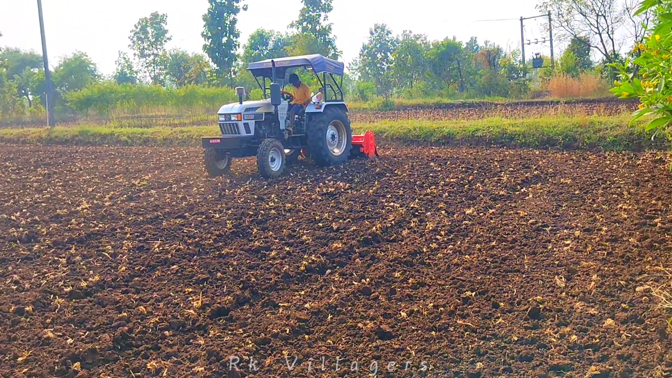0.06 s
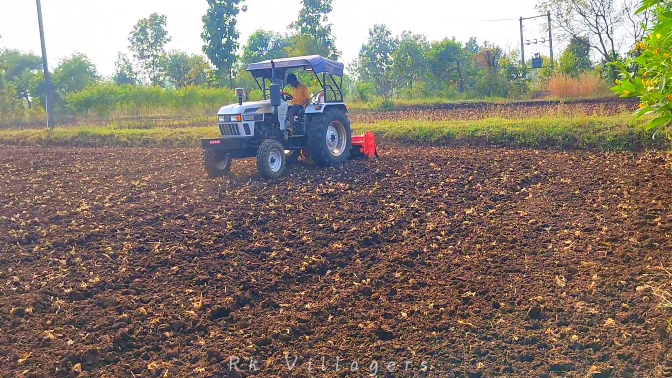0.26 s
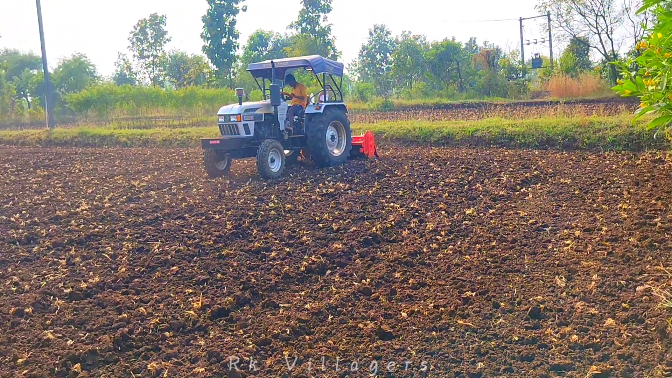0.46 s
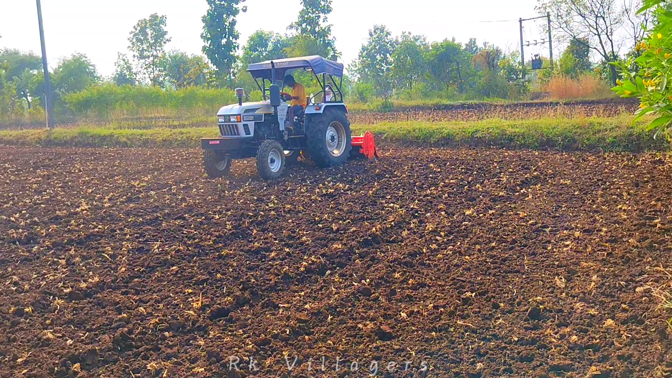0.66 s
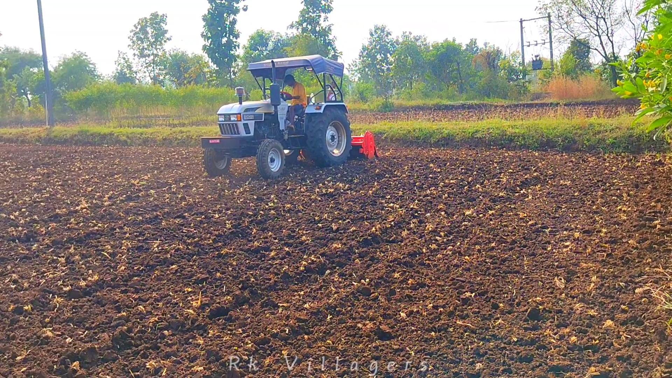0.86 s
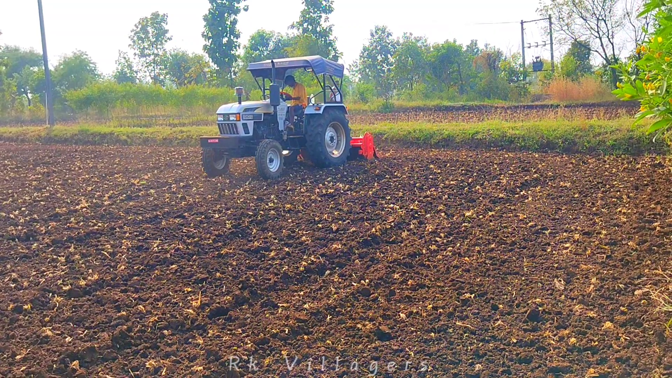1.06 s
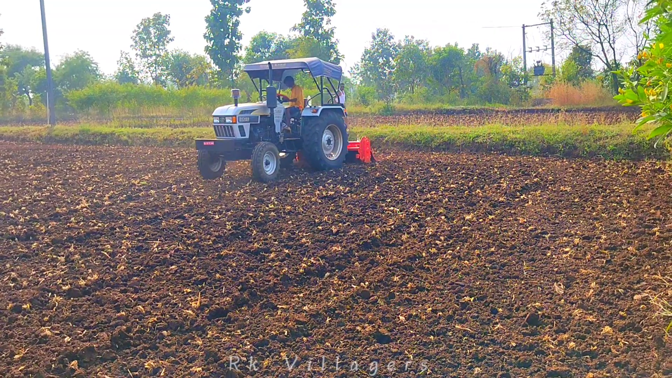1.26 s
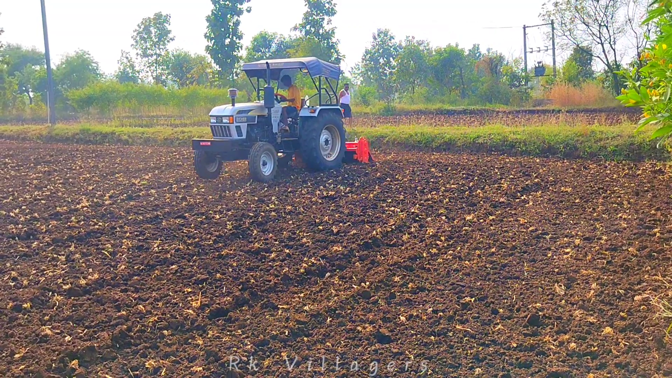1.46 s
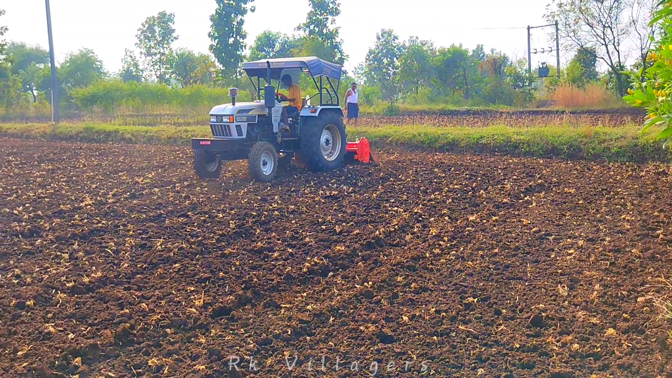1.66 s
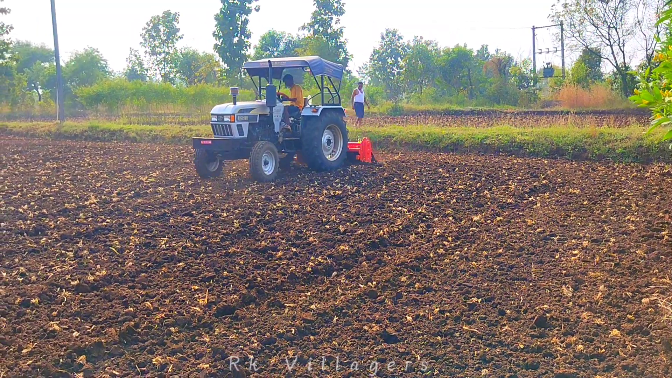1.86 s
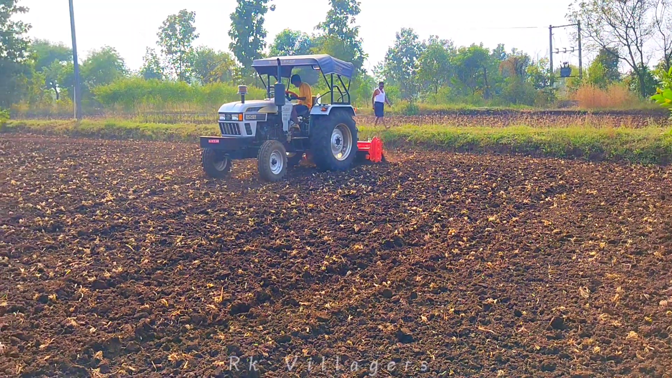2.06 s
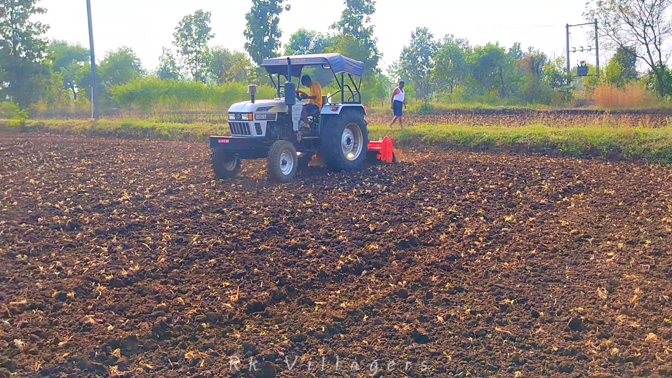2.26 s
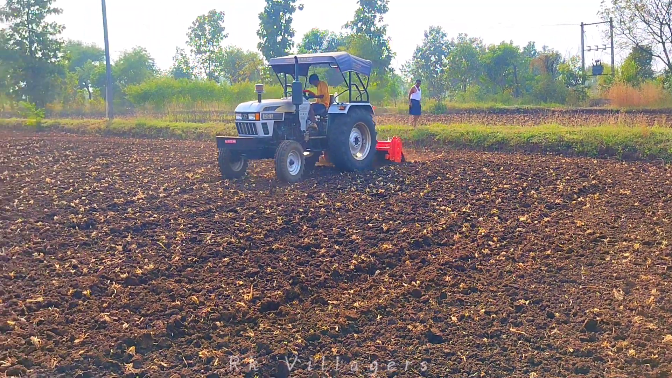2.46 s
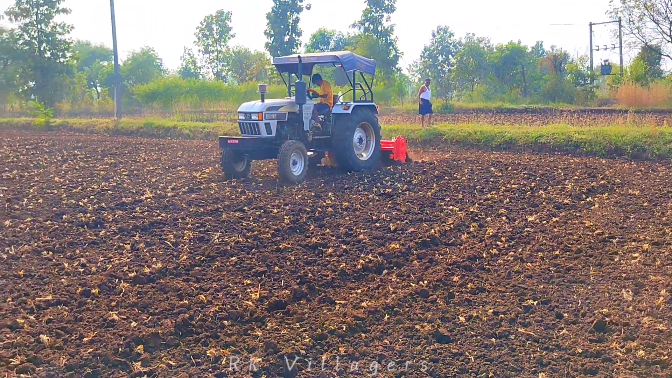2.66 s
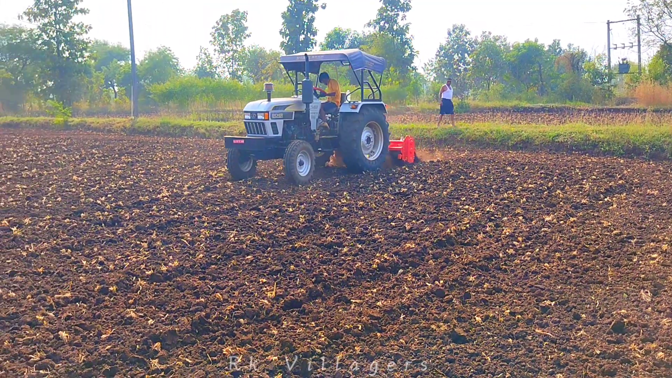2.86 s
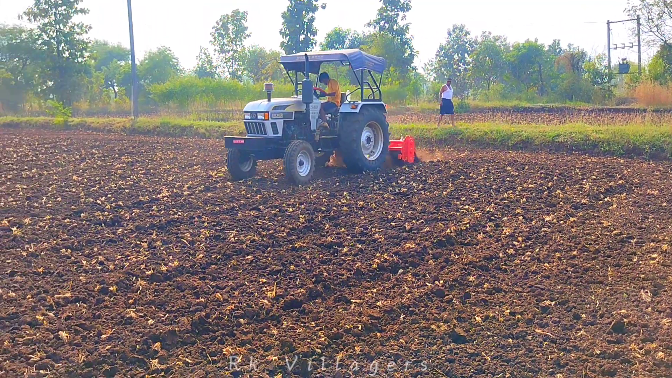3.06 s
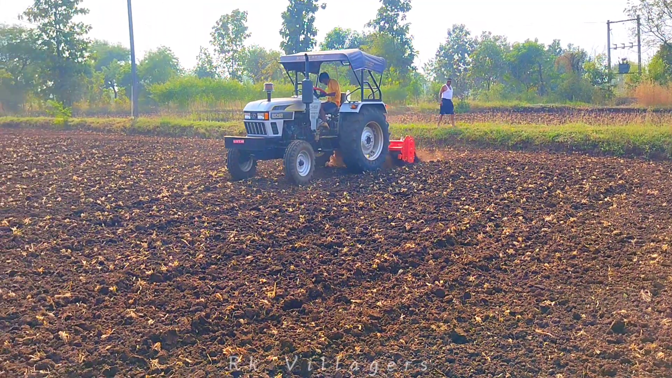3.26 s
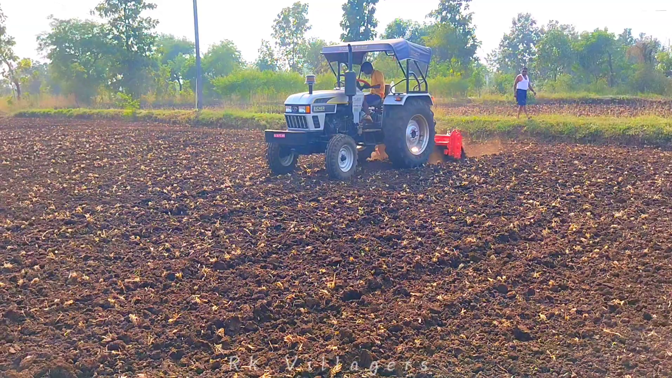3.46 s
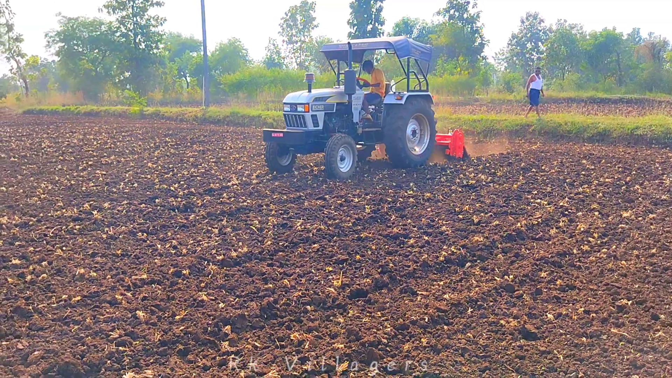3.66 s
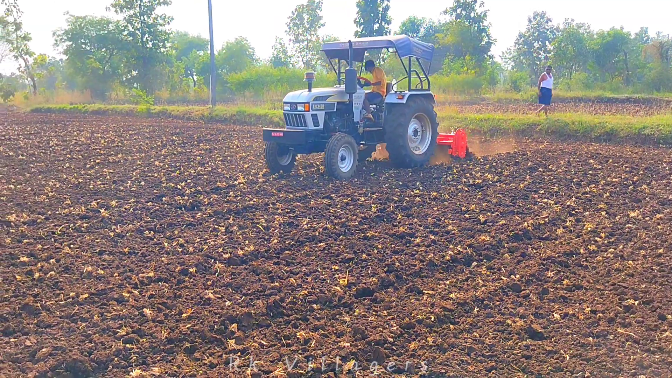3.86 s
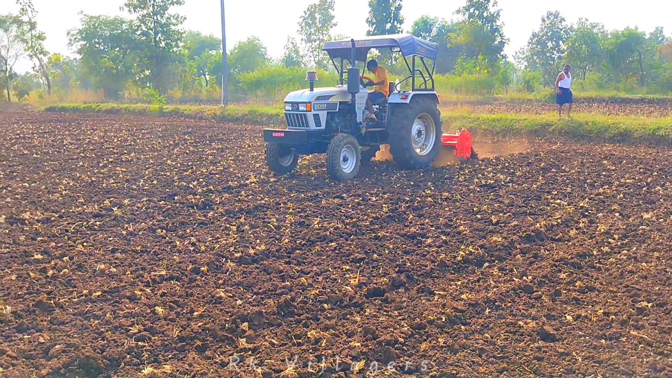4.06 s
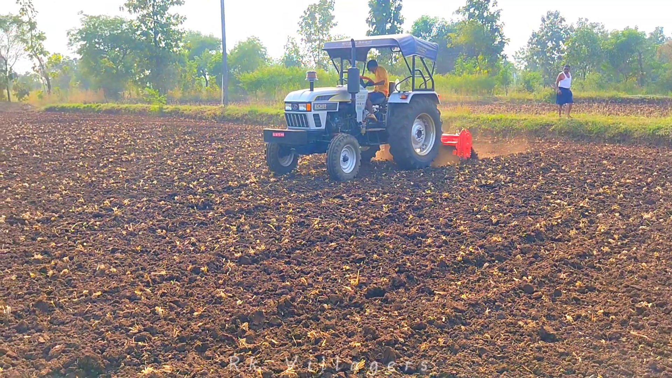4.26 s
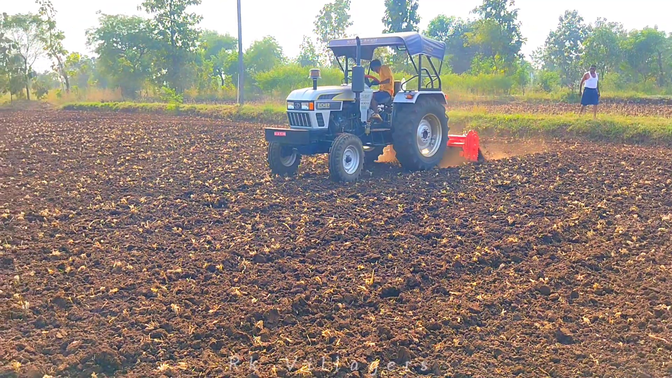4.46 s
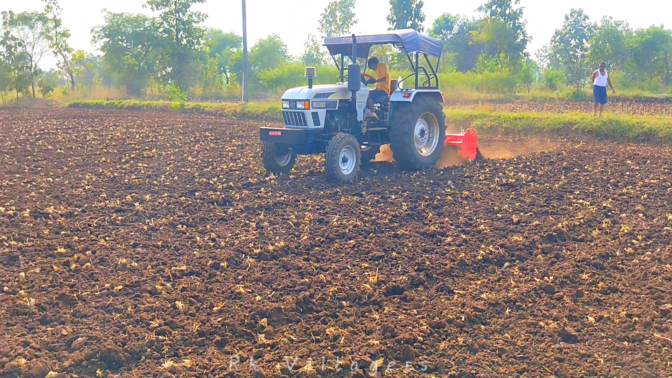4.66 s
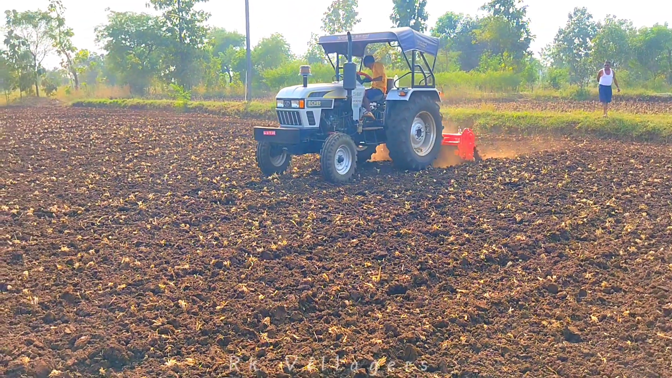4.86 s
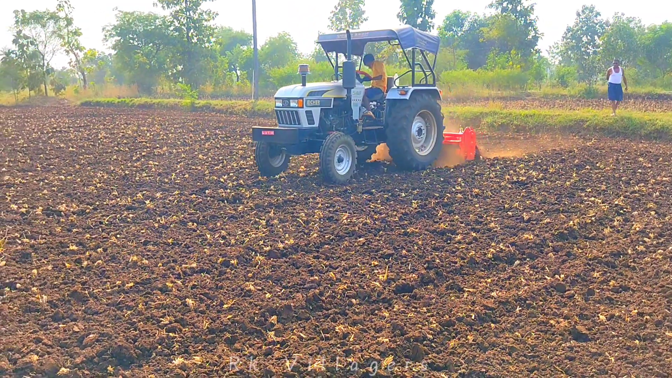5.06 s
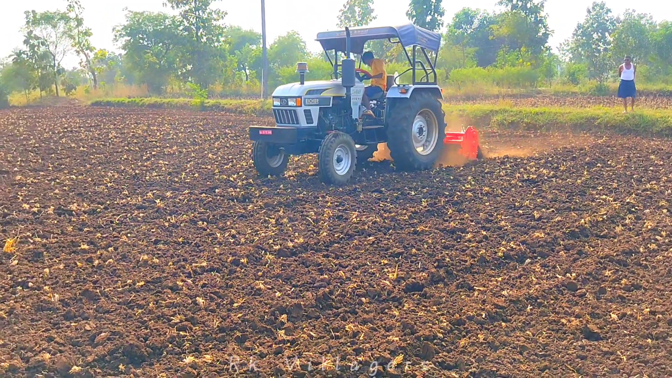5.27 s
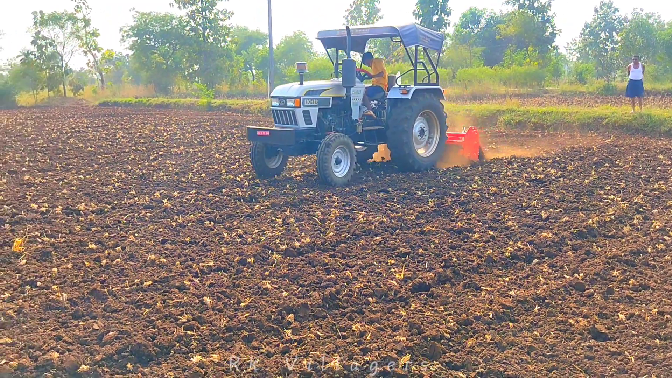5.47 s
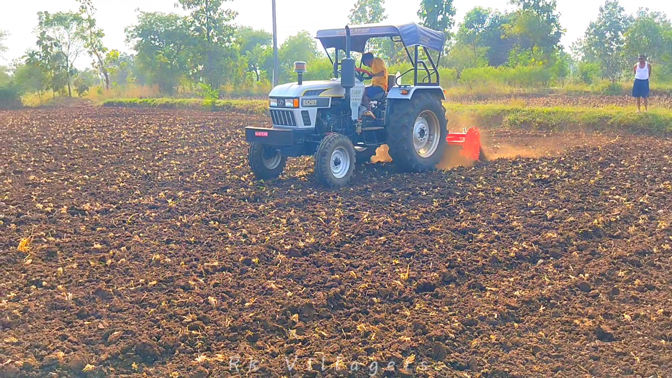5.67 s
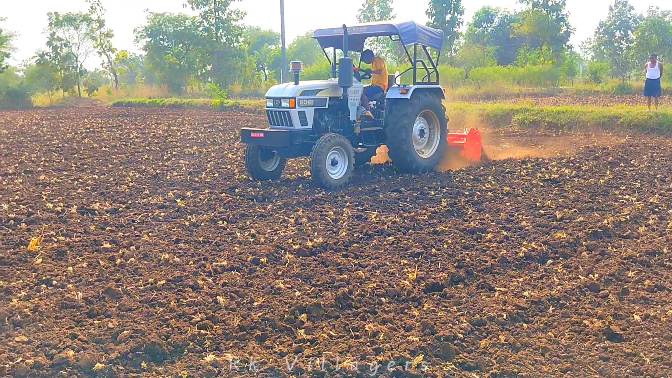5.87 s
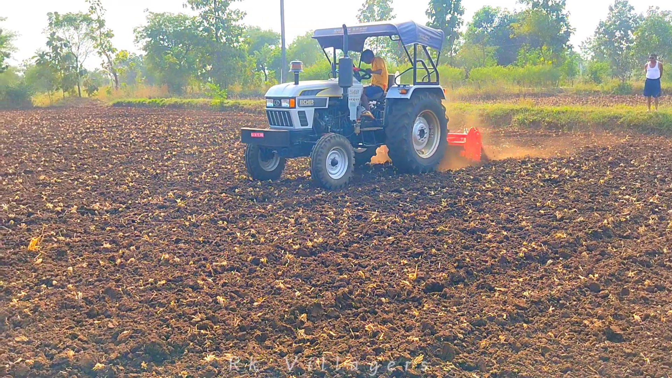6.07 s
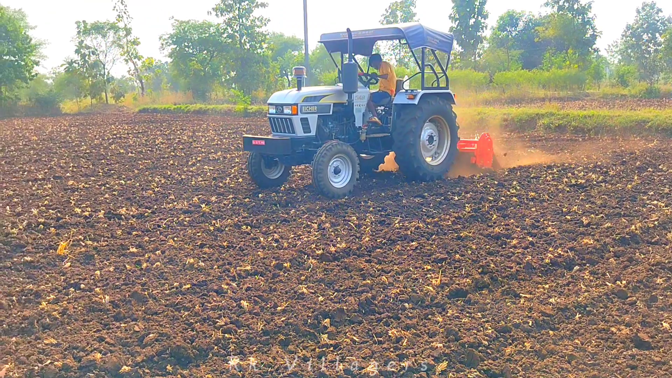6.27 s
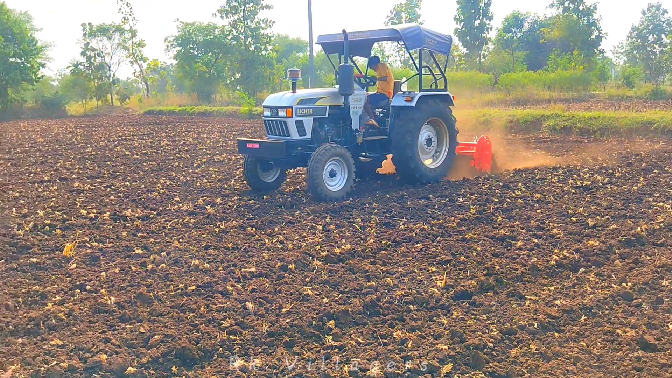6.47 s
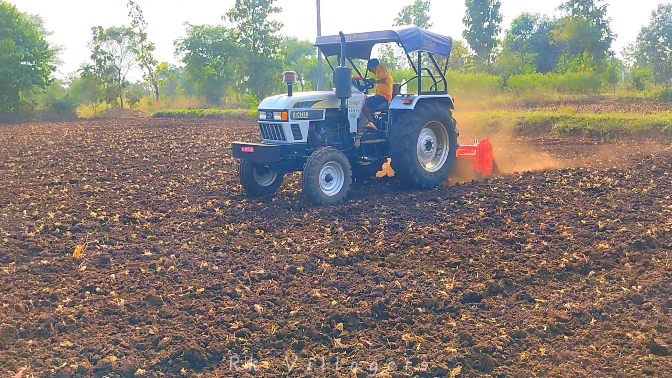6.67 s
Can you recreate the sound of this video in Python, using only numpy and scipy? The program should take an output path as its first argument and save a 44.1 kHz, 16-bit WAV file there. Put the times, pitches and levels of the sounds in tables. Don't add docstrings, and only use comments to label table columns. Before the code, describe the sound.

Outdoors in an open field, a three-cylinder diesel tractor idles with soft, separate chugs and iron clatter. After about a second it throttles up, the beats quickening into a deep, spitting exhaust roar. It overshoots, eases briefly, then returns under load, dragging a rotary tiller with a hiss and faint gear whine. A fixed stereo microphone at some distance hears it draw nearer, brighter and more rattly.

```python
import sys
import numpy as np
from scipy import signal
from scipy.fft import rfft, irfft
from scipy.io import wavfile
from scipy.ndimage import uniform_filter1d

SR = 44100
rng = np.random.default_rng(int(sys.argv[2]) if len(sys.argv) > 2 else 0)


def gain_from_db(level_db):
    decades = np.asarray(level_db, float) / 20
    return 10 ** decades


def digitize_waveform(pressure):
    field = np.atleast_2d(pressure).T
    bounded = np.clip(field, -1, 1)
    quanta = np.round(bounded * 32767).astype(np.int16)
    wavfile.write(sys.argv[1], SR, quanta)


N = 296330


def level(x, db):
    return x * gain_from_db(db) / np.sqrt(np.mean(x ** 2))


def on_hz(table, column):
    hz = np.maximum(np.arange(N // 2 + 1) * SR / N, 1)
    return np.interp(np.log(hz), np.log(np.array(table)[:, 0]), np.array(table)[:, column])


def colour(x, gain_db):
    return irfft(rfft(x) * gain_from_db(gain_db), N)


def ring(x, modes):
    out = 0
    for hz, width, db in modes:
        out = out + gain_from_db(db) * signal.lfilter(*signal.iirpeak(hz, hz / width, SR), x)
    return out


def walk(rate):
    k = int(SR / rate)
    steps = np.repeat(rng.standard_normal(N // k + 1), k)
    x = uniform_filter1d(uniform_filter1d(steps, k), k)[:N]
    return x / x.std()


def strokes(times, sizes):
    place = np.clip(times * SR, 0, N - 2)
    out, i = np.zeros(N), place.astype(int)
    np.add.at(out, i, sizes * (1 - place + i))
    np.add.at(out, i + 1, sizes * (place - i))
    return out


def puffs(clicks, rise_s, fall_s):
    t = np.arange(int(.06 * SR)) / SR
    out = signal.fftconvolve(clicks, (1 - np.exp(-t / rise_s)) * np.exp(-t / fall_s))[:N]
    return np.maximum(out, 0) / out.mean()


# frequency in Hz, likeness of the ports 0-1, left minus right in dB.
PORTS = [(583, 0.9, 1), (860, 1, 0), (1380, 0.88, 0), (1940, 0.29, 0), (3700, 0.31, -0.5),
         (5430, 0.4, -5.5), (7000, 0.14, -2), (9300, 0.18, 0.5), (11200, 0.55, 11), (12900, 0, -2),
         (14700, 0.9, -2)]
BASS_PORT = [(150, .999, 0)]
ALL_PORTS = list(BASS_PORT) + list(PORTS)


def air():
    right_lag_s = .00021
    like = np.clip(on_hz(ALL_PORTS, column=1), 0, 1)
    shared, left, right = rfft(rng.standard_normal((3, N)))
    hz = np.arange(len(like)) * SR / N
    late = np.exp(-2j * np.pi * hz * right_lag_s * np.clip((hz - 400) / 1100, 0, 1))
    common = np.sqrt(like) * np.array([shared, shared * late])
    own = np.sqrt(1 - like) * np.array([left, right])
    return irfft(common + own, N)


# time in seconds, firing rate in firings per second.
SPEED = [(0, 18.571), (.13, 19.452), (.6, 19.021), (.96, 19.39), (1.28, 19.46), (1.45, 22.643),
         (1.86, 26.392), (2.83, 37.882), (3.14, 37.883), (3.54, 37.123), (4.44, 37.019), (5.11, 37.323),
         (5.61, 36.735), (6.72, 37.023)]


def crank(t):
    already_turned = .733
    hz = np.interp(t, *np.transpose(SPEED))
    return already_turned + np.cumsum(hz) / SR, 20 * np.log10(hz / hz.max())


def firings(count, t):
    return np.interp(np.arange(1, int(count[-1]) + 1), count, t)


# time in seconds, fuel load in dB re full, air draw in dB re full.
EFFORT = [(0, -25, -5.5), (.25, -25, -9), (.85, -12.5, -7), (1.05, -5, -1), (1.3, 0, 1.5), (2.05, -1, 2),
          (2.45, 0, 0), (2.65, 0, -6), (2.9, -2.5, -4), (3.05, -4.5, -9), (3.25, -8, -10), (3.5, -3, -5),
          (4.0, -2, 0), (4.5, -1, -1), (6.72, -1, -3)]


def levels(t, speed_db):
    stack_holds_s, bite_s = 0.093, 2.4
    s, load, draw = np.transpose(EFFORT)
    held = np.maximum(np.interp(t, s, load), np.interp(t - stack_holds_s, s, load))
    load, draw = np.interp(t, s, load), np.interp(t, s, draw)
    thump = gain_from_db(-20 + load)
    hum = gain_from_db(-29 + draw)
    knock = gain_from_db(-27.5 + 0.2 * load + 0.51 * t)
    tilling = -1.5 * np.clip(t - bite_s, 0, 1) * np.exp(-np.maximum(t - bite_s, 0) / 0.83)
    spit = gain_from_db(-50.5) + gain_from_db(-34 + tilling + 5.3 * np.minimum(held + .5, 0))
    fan = gain_from_db(-39.5 + 0.55 * speed_db + 0.16 * load + 1.5 * t)
    return thump, hum, knock, spit, fan


CYLINDER_DB = [-1.1, -3, -0.5]
# frequency in Hz, width in Hz, level in dB.
STACK = [
    (41, 41, 0),
    (110, 59, 0),
]


def exhaust(fired, gap, chance):
    fast = gap.min() / gap
    size = gain_from_db(np.resize(CYLINDER_DB, len(fired)) * fast ** 2 + .55 * chance[0]) * np.sqrt(gap)
    slow = np.clip(gap / gap.min() - 1.1, 0, .6) / .6
    flow = 0
    for share, width_s in ((1 - slow, .0012), (.85 * slow, .0019)):
        slug = np.exp(-.5 * (np.arange(-400, 401) / SR / width_s) ** 2) / width_s
        clicks = strokes(fired - .0061 + .0001 * chance[1], share * size)
        flow = flow + signal.fftconvolve(clicks, slug, "same")
    thump = ring(ring(flow, STACK[:1]), STACK[1:])

    t = np.arange(N) / SR
    gusts = 5.1 + puffs(strokes(fired - .008, size), 0.0035, 0.002)
    rumble = ring(air() * gusts, [(384, 163, 0.5), (154, 106, 3), (276, 36, -2.0)])
    rumble = rumble * (gap.min() / np.interp(t, fired, gap)) ** 1.06
    rumble = gain_from_db(0.66 * t) * level(rumble, -13.5)

    bark = strokes(fired - .0062, size * fast ** 1.3 * gain_from_db(4.1 * chance[27]))
    bark = ring(ring(bark, [(385, 60, 1.3), (230, 23, 0.53)]), [(317, 92, 0)])
    return level(thump, 0) + rumble + level(bark, -18.5)


# frequency in Hz, width in Hz, level in dB.
MOUTH = [(2507, 113, 5), (2706, 71, 2), (3093, 160, 3.5), (3611, 305, 3), (3840, 220, -5.5),
         (4820, 1050, -4), (5340, 57, 2), (6070, 97, -8), (7680, 3000, -10.5), (9130, 210, -5.5),
         (10630, 790, -14.5), (13700, 1000, -17)]


def jet(fired, chance, modes, scatter_db):
    out = 0
    for k, mode in enumerate(modes):
        size = gain_from_db(1.35 * chance[4] + scatter_db * chance[5 + k])
        gate = puffs(strokes(fired - .0075 + 0.00056 * chance[15 + k], size), 0.0021, 0.0025)
        narrow = ring(air() * (0.98 + gate), [mode])
        out = out + ring(narrow, [(mode[0], 2 * mode[1], 0)])
    return level(out, 0)


# frequency in Hz, width in Hz, level in dB.
BLOCK = [(787, 35, 1), (843, 20, 1), (770, 170, 1), (370, 140, -14), (1200, 200, -9), (1365, 70, -2),
         (1500, 110, -1), (1850, 200, -12)]
# frequency in Hz, width in Hz, level in dB.
BONNET = [(560, 60, -8), (617, 18, 1), (693, 16, 3), (660, 160, -3), (1990, 220, -2), (1110, 150, -9)]


def block(fired, gap, chance, load):
    knock = puffs(strokes(fired + .15 * gap, gap * gain_from_db(1.8 * chance[2])), .0015, .0045)
    valves = puffs(strokes(fired + 0.442 * gap, gap ** 1.88 * gain_from_db(0.64 * chance[3])), 0.00034, 0.014)
    knock = knock + 0.99 * load * puffs(strokes(fired - .0035, gain_from_db(3.0 * chance[26])), 0.0013, 0.0041)
    speed = gap.min() / np.interp(np.arange(N) / SR, fired, gap)
    low = ring(air() * (2.17 * speed + 0.57 * knock + .5 * valves), BLOCK[:4])
    low = ring(low, [(765, 2100, -2.0), (382, 185, 0)])
    high = ring(air() * (1.29 * speed ** 3.2 + 0.63 * knock + 0.49 * valves), BLOCK[4:])
    high = ring(high, [(1480, 6400, 2.77)])
    bonnet = speed ** 2 * ring(air() * (2.6 + 0.64 * knock), BONNET)
    return level(low + high + bonnet, 0)


def intake(count, fired, gap):
    late = np.roll(count, 120)
    hum = np.sqrt(2) * np.cos(4 * np.pi * late - 2.3)
    cleaner = [(101, 57, 0)]
    gulp = ring(ring(strokes(fired + .23 * gap, -gap ** 3), cleaner), cleaner)
    return hum + level(gulp, -12)


# frequency in Hz, density in dB per Hz.
HISS = [(1290, 0), (2200, 4), (3200, -10), (3590, -1), (4330, -8), (5320, -6.5), (6260, -7), (8680, -4.5),
        (10700, -6), (13100, -12), (15500, -13.5)]


def hiss():
    shape = on_hz([(1400, -60)] + list(HISS), column=1)
    soil = on_hz([(9000, -40), (11500, 0), (15500, 0)], column=1)
    fan = colour(air() * gain_from_db(1.0 * walk(14)), shape - 8 * gain_from_db(soil))
    thrown = colour(air() * gain_from_db(2.0 * walk(30) + .4 * walk(14)), shape + soil)
    return level(fan + thrown, 0)


def gear(count, t):
    whine = np.sin(2 * np.pi * 30 * count + .9 * walk(9))
    return np.clip((t - 3.0) / .8, 0, 1) * whine * gain_from_db(1.5 * walk(3))


# frequency in Hz, width in Hz, level in dB.
GROUND_DIPS = [(480, 100, -4), (990, 110, -8), (1630, 180, -4), (2250, 200, -9)]


def ground(x):
    return x - ring(x, GROUND_DIPS)


# frequency in Hz, level in dB.
FIELD = [(20, -30), (120, 0), (300, -6), (1000, -12), (4000, -24), (15000, -34)]


def field():
    return level(colour(air(), on_hz(FIELD, column=1)), -52)


def scene():
    t = np.arange(N) / SR
    count, speed_db = crank(t)
    fired = firings(count, t)
    gap = np.gradient(fired)
    chance = rng.standard_normal((len(fired), 28)).T
    thump, hum, knock, spit, fan = levels(t, speed_db)
    tractor = thump * exhaust(fired, gap, chance)
    tractor = tractor + hum * intake(count, fired, gap)
    tractor = tractor + knock * block(fired, gap, chance, thump / thump.max())
    idle = np.clip(1.6 - np.interp(fired, t, thump) / gain_from_db(-30), 0, 1)
    spat = fired - 0.0118 * idle
    tractor = tractor + spit * jet(spat, chance, MOUTH[:8], scatter_db=5.0)
    tractor = tractor + fan * hiss() + gain_from_db(-38) * gear(count, t)
    edge = gain_from_db(-6.5 + 0.52 * t) * np.sqrt(spit * fan)
    tractor = tractor + edge * jet(spat, chance[::-1], MOUTH[8:], scatter_db=2.5)
    return ground(tractor) + field()


def low_pass(x):
    return signal.sosfilt(signal.butter(12, 16670, fs=SR, output="sos"), x)


def record(dry):
    tilt = on_hz(ALL_PORTS, column=2) / 2
    cut = -90 * (np.arange(len(tilt)) * SR / N > 15800)
    quadrature = np.imag(signal.hilbert(dry.mean(axis=0)))
    dry = dry + gain_from_db(-42.5) * quadrature * np.array([[1], [-1]])
    mix = colour(dry, np.array([tilt, -tilt]) + cut)
    return low_pass(mix)


dry = scene()
out = record(dry)
digitize_waveform(out)
```